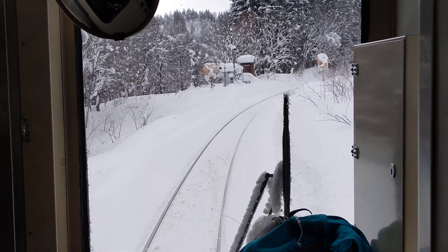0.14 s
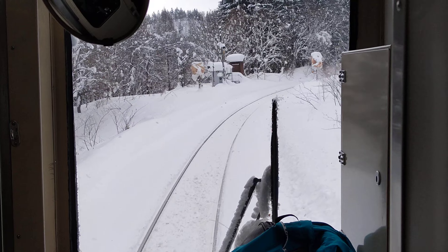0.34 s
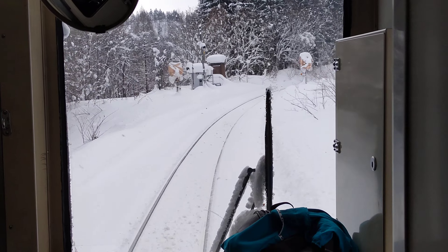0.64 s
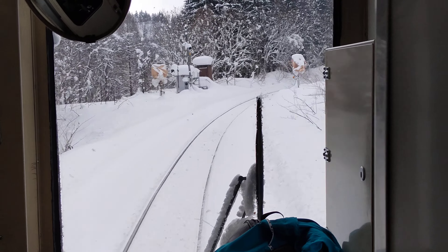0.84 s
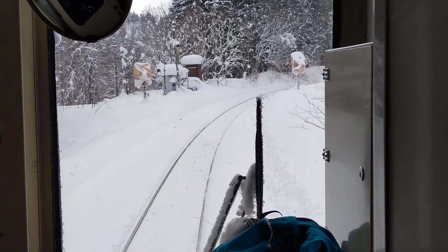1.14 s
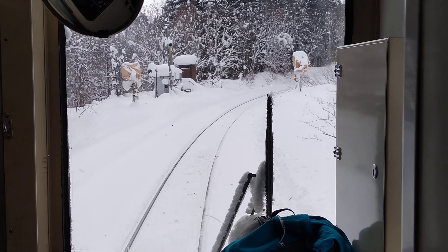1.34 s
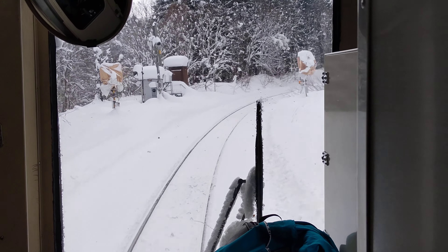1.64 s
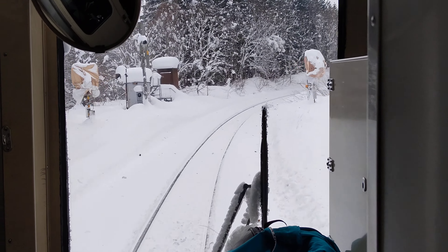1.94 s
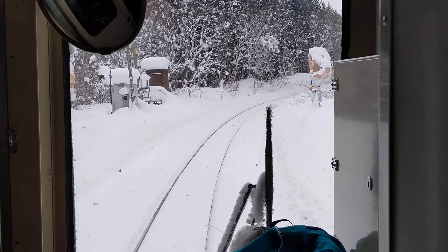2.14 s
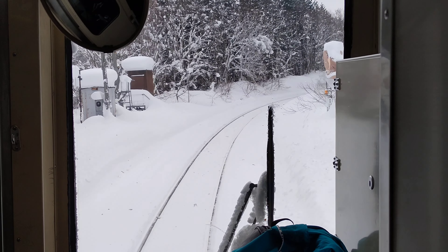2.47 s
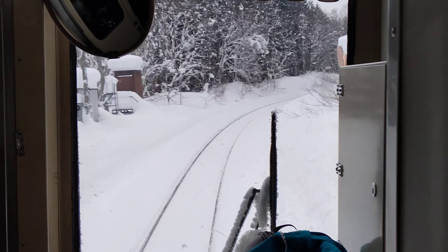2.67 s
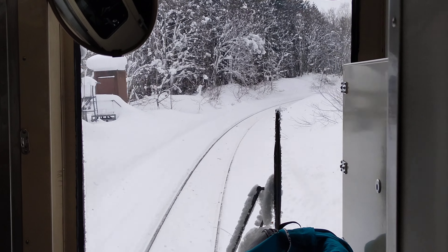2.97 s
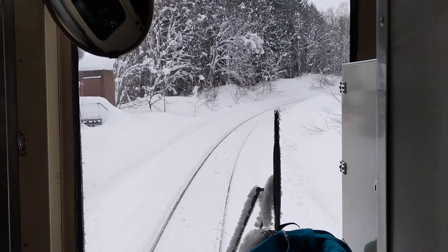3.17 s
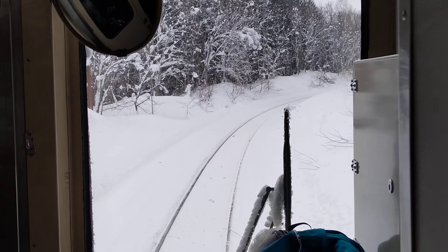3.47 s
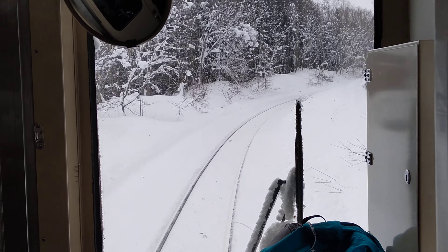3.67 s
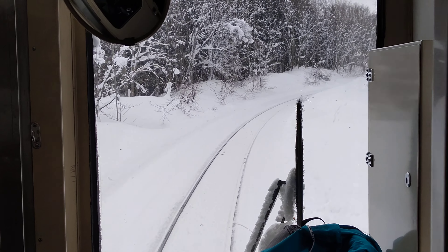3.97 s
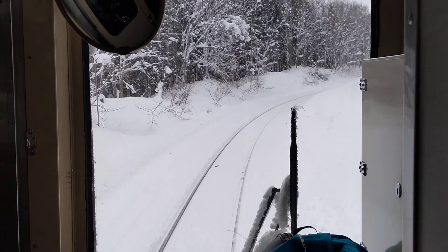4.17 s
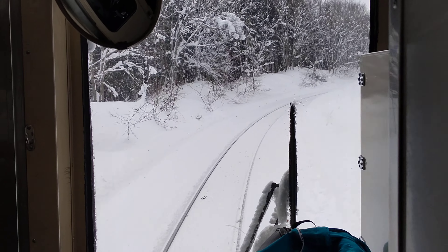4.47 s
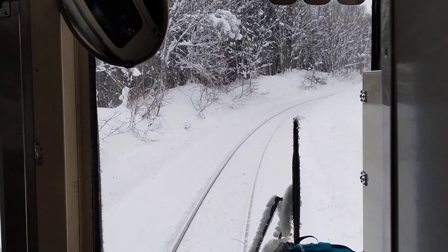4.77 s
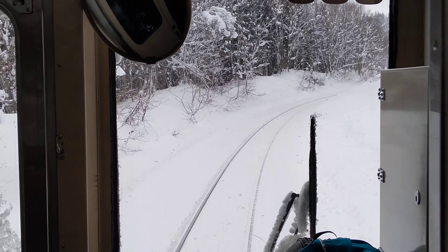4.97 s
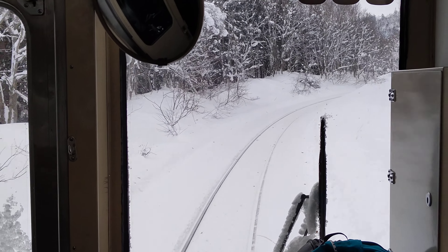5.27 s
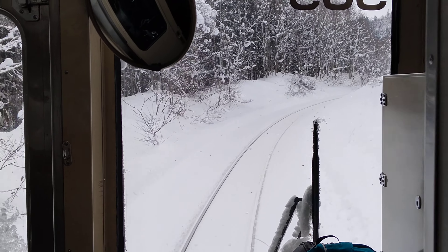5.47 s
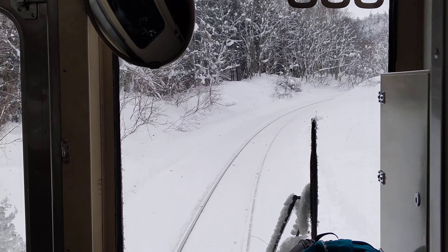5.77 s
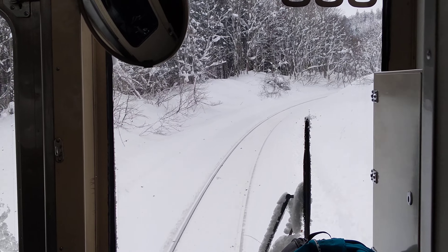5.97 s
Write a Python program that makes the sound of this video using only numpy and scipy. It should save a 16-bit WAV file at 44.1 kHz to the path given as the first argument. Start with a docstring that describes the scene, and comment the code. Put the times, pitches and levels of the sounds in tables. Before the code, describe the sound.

Inside the front cab of a moving diesel railcar, a heavy low rumble and soft rolling roar run throughout. Dull wheel thuds and loose fittings clatter in the first second. The underfloor engine then revs up, booming through the body, shuts off briefly near 2.7 seconds and settles into a steady drone. Small ticks and a few stronger thuds follow. Close, bass-heavy stereo, slightly overloaded on the loudest booms.

```python
"""Diesel railcar cab on a snowy line

Heard from inside the front cab while the railcar rolls along. The underfloor engine is a set of sine
orders that revs up and settles, booming through cab and body. The rolling wheels and the sway are shaped
noise; the wheels thud over joints in bursts of noise that ring the car body. Loose fittings rattle and
tick as short noise, narrow resonances ring, the rolling roar swells in chance patches of pitch, and
damped sines knock under the floor."""
import sys
import numpy as np
from scipy import signal
from scipy.fft import rfft, irfft, next_fast_len
from scipy.io import wavfile
from scipy.ndimage import uniform_filter1d

SR = 44100
rng = np.random.default_rng(int(sys.argv[2]) if len(sys.argv) > 2 else 0)


def voltage_ratio(decibels):
    """Convert decibels (scalar or array-like) to amplitude ratios, 20 dB per decade."""
    exponent = np.asarray(decibels, float) / 20
    return 10 ** exponent


def bounce(signal):
    """Save signal as a 16-bit WAV file at the path given by the first command-line argument."""
    frames = np.transpose(np.atleast_2d(signal))
    limited = np.clip(frames, -1, 1)
    pcm = np.round(limited * 32767).astype(np.int16)
    wavfile.write(sys.argv[1], SR, pcm)


N = 269451   # length in samples

# Resonances of the car body. Each row: pitch in Hz, width in Hz, strength in dB.
BODY_RESONANCES = [(35, 11, -6), (75, 37, 6), (122.2, 44, 7.5), (154.7, 21.4, 8), (161.2, 7.7, 5),
                   (188.3, 7.7, -2), (240, 35, 4.5), (277.5, 12, 6.5), (370, 16, 2), (476, 12, 4),
                   (657, 10, 4.5)]
# Colour of the rolling roar in the cab. Each row: frequency in Hz, relative level in dB per Hz.
ROAR_COLOUR = [(180, -23.5), (300, 0), (330, -6), (456, -9), (518, -13.5), (649, -11.5), (813, -14.5),
               (1220, -16.5), (1970, -16), (2510, -26), (3690, -25), (7250, -36.5), (12700, -42),
               (14000, -43)]
# How alike left and right are. Each row: frequency in Hz, likeness from -1 (opposite) to 1 (the same).
LIKENESS_BY_PITCH = [(60, 1), (130, 0.94), (280, 0.9), (610, 0.5), (1330, -0.23), (2880, 0.053),
                     (6250, -0.08), (13600, 0.041)]


def rms_one(x):
    """Scales a sound to an rms of 1."""
    return x / np.sqrt(np.mean(x ** 2) + 1e-20)


def in_time(rows):
    """Joins rows that begin with a time into one curve of straight lines per remaining column."""
    s, *columns = np.transpose(rows)
    return [np.interp(np.arange(N) / SR, s, column) for column in columns]


def at_hz(points, hz):
    """Reads a (Hz, value) curve between its points, on a logarithmic pitch scale."""
    point_hz, values = np.transpose(points)
    return np.interp(np.log(hz), np.log(point_hz), values)


def drift(rate_hz):
    """Slow chance wandering of spread 1: noise through two equal low-pass poles."""
    pole = np.exp(-80 * np.pi * rate_hz / SR)   # computed at every 40th sample only
    noise = rng.standard_normal(N // 40 + 2002)
    slow = signal.lfilter([1], [1, -2 * pole, pole * pole], noise)[2000:]   # skip the start-up
    slow = rms_one(slow - slow.mean())
    return np.interp(np.arange(N) / 40, np.arange(len(slow)), slow)


def resonant_gain(peaks, hz):
    """Gain of a flat path plus a row of resonances, whose powers add."""
    power = 1
    for top, width, db in peaks:
        power = power + voltage_ratio(db) ** 2 / (1 + (2 * (hz - top) / width) ** 2) ** 2
    return np.sqrt(power)


def within(hz, low_hz, high_hz):
    """Gain of a band with steep edges."""
    return 1 / np.sqrt((1 + (low_hz / hz) ** 8) * (1 + (hz / high_hz) ** 8))


def as_stereo(mid, side, alike):
    """Mixes two unrelated noises into left and right with the wanted likeness."""
    return np.sqrt(1 + alike) * mid + np.sqrt(1 - alike) * side * np.array([[1], [-1]])


def stereo_noise(gain_at):
    """Two-channel noise with a given spectrum, alike in the bass and nearly unrelated in the treble; rms 1."""
    size = next_fast_len(N)
    hz = np.maximum(np.arange(size // 2 + 1) * SR / size, .1)
    alike = np.clip(at_hz(LIKENESS_BY_PITCH, hz), -.99, .99)
    mid, side = rfft(rng.standard_normal((2, size))) * gain_at(hz)
    return rms_one(irfft(as_stereo(mid, side, alike), size)[:, :N])


def evened(noise, window_s):
    """Noise with its slower chance swells flattened."""
    power = uniform_filter1d(np.mean(noise ** 2, axis=0), size=int(window_s * SR))
    return noise / np.sqrt(power + .05)


def bursts(times, db, t60, rise_s):
    """Envelope of blows that swell quickly and die away by 60 dB in t60 seconds; powers add."""
    power = np.zeros(N)
    for s, level, decay in np.broadcast(times, db, t60):
        start = round(s * SR)
        t = np.arange(min(N - start, int(decay * SR))) / SR
        blow = voltage_ratio(level - 60 * t / decay) * (1 - np.exp(-t / rise_s))
        power[start:start + len(t)] += blow ** 2
    return np.sqrt(power)


def swells(rows):
    """Noise rings through one resonance: wide ones speak at once, narrow ones swell; then they fade."""
    out = np.zeros((2, N))
    count = 8192   # samples per swell
    t = np.arange(count) / SR
    bins_hz = np.arange(count // 2 + 1) * SR / count
    for s, hz, width, db, length in rows:
        start = round(s * SR)
        mid, side = rng.standard_normal((2, count))
        alike = np.clip(at_hz(LIKENESS_BY_PITCH, hz), -.99, .99)
        spectrum = rfft(as_stereo(mid, side, alike)) / (1 + (2 * (bins_hz - hz) / width) ** 2)
        noise = rms_one(irfft(spectrum))
        rise = 1 - np.exp(-1.3 * width * t)
        fade = np.exp(-(1.35 * t / length) ** 0.98) * (1 - t * SR / count)   # reaches silence at the end
        out[:, start:start + count] += (voltage_ratio(db) * noise * 2.1 * rise * fade)[:, :N - start]
    return out


def rolling():
    """Sway mostly below hearing, rumble ringing the body, and a diffuse roar that flickers by band."""
    # Each row: time in seconds, rumble in the body in dB, roar in the cab in dB.
    roll_levels = [(0.0, -31.5, -45.5), (0.59, -25.5, -43), (0.87, -23, -43.5), (2.47, -22.5, -44),
                   (2.77, -28.5, -46), (4.07, -25, -42.5), (4.2, -28, -43.5), (4.93, -24.5, -43.5),
                   (5.21, -30.5, -44), (6.11, -27.5, -43.5)]
    # Each row: frequency in Hz, relative level in dB per Hz before the body colours it.
    rumble_colour = [(25, -4), (50, -6.5), (76, 1), (98, -5.5), (130, 3.5), (220, -7), (400, -21),
                     (600, -25.5), (1200, -83)]

    def body(hz):
        return resonant_gain(BODY_RESONANCES, hz)

    def sway_gain(hz):
        slow_hump = hz / 8.5 / (1 + (hz / 11) ** 3.52)
        return slow_hump * body(hz) * within(hz, 1.6, 49) ** 0.27

    rumble_db, roar_db = in_time(roll_levels)
    sway_db = -18.5 + 2 * drift(1.7)
    rumble_db = rumble_db + 1.93 * drift(27)
    sway = stereo_noise(sway_gain)
    rumble = stereo_noise(lambda hz: voltage_ratio(at_hz(rumble_colour, hz)) * body(hz))
    # the roar is split at 2500 Hz; only its lower part rings the body
    low = stereo_noise(lambda hz: voltage_ratio(at_hz(ROAR_COLOUR, hz)) * body(hz) * (hz < 2500))
    high = stereo_noise(lambda hz: voltage_ratio(at_hz(ROAR_COLOUR, hz)) * (hz >= 2500))
    shared = drift(7)   # both parts follow this one together
    low_db = 6 + 0.37 * shared + 1.7 * drift(22.0)
    high_db = -6.5 + 1.0 * shared + 0.27 * drift(21)
    roar = voltage_ratio(low_db) * low + voltage_ratio(high_db) * high
    return voltage_ratio(sway_db) * sway + voltage_ratio(rumble_db) * rumble + voltage_ratio(roar_db) * roar


def roar_patches():
    """The roar's wandering patchiness: faint noise swells scattered by chance through the middle range."""
    when, pitch, loudness, length = rng.random((110, 4)).T
    hz = 350 * 6.5 ** pitch   # 350 to 2275 Hz
    db = at_hz(ROAR_COLOUR, hz) + 10 * np.log10(hz) - 70.5 + 5 * loudness   # follows the roar at that pitch
    return swells(zip(when * (N - 1) / SR, hz, .11 * hz, db, .04 + .1 * length))


def rings():
    """Short noises ring resonances in the cab; each resonance keeps its own pitch and width."""
    # Each row: start in seconds, name of the resonance, level in dB, fading length in seconds.
    ring_times = [(.09, "hum", -21, 0.06), (.345, "bonk", -24.5, 0.05), (.385, "thump", -11.5, 0.034),
                  (.485, "thump", -16, 0.034), (.737, "clink", -38.5, .089), (.745, "clack", -40, 0.035),
                  (.76, "ping", -27.5, 0.023), (.79, "hum", -13, 0.069), (.88, "tock", -42, .07),
                  (.93, "deep hum", -30, 0.076), (1.08, "hum", -6, 0.032), (1.18, "high hum", -24, 0.11),
                  (1.4, "thump", -26, 0.16), (1.81, "boom", -9, 0.089), (2.55, "moan", -42.5, 0.36),
                  (2.97, "squeak", -49.5, 0.39), (3.58, "moan", -41, 0.091), (3.67, "ping", -38, 0.06),
                  (4.18, "squeak", -49.5, 0.21), (4.93, "clack", -41, 0.038), (5.145, "ping", -37, 0.024),
                  (5.15, "moan", -43.5, 0.16)]
    # Resonances in the cab, named as heard. Each name leads to: pitch in Hz, width in Hz.
    ringers = {"deep hum": (93, 14), "hum": (121.7, 25), "boom": (141, 19.4), "high hum": (144, 16),
               "thump": (234, 31.5), "bonk": (337, 46), "moan": (640, 31), "tock": (856, 50),
               "ping": (1145, 67), "clack": (1310, 110), "squeak": (1880, 220), "clink": (4830, 700)}
    return swells((s, *ringers[which], db, length) for s, which, db, length in ring_times)


def taps():
    """Dry broad ticks of noise that fall by 60 dB in 0.03 s, some duller than others."""
    # Each row: start in seconds, level in dB, left over right in dB, treble relative to the rest in dB.
    ticks = [(0.835, -35.5, -7.5, -12), (3.2655, -44.5, -2.5, -13.5), (3.275, -40.5, 8.5, -15),
             (3.2973, -42.5, -4, -10), (3.3112, -39.5, 2.5, -25.5), (3.793, -44, 0.1, -14),
             (4.344, -40, 7.5, -1.5), (4.36, -36.5, 8, -8.5)]
    out = np.zeros((2, N))
    hz = np.arange(1, 1026) * SR / 2048
    t = np.arange(2048) / SR
    for s, db, pan_db, top_db in ticks:
        middle = within(hz, 2300, 8500) * (hz / 3000) ** -.4
        treble = voltage_ratio(top_db) * within(hz, 8500, 14000)
        noise = rms_one(irfft(rfft(rng.standard_normal((2, 2048))) * (middle + treble)))
        sides_db = np.array([[.5], [-.5]]) * pan_db
        envelope = voltage_ratio(db - 60 * t / .03 + sides_db) * (1 - np.exp(-t / .0005))
        start = round(s * SR)
        out[:, start:start + 2048] += noise * envelope
    return out


def rattles():
    """Loose fittings chatter: grainy noise in three ranges whose strength differs from blow to blow."""
    # Each row: start in seconds, level of the middle range in dB, low range relative to it in dB,
    # high range relative to it in dB, left over right in dB.
    rattle_blows = [(0.031, -44.5, -17, -2.5, -1), (0.427, -41, -6, -17, 4.5), (0.4678, -31.5, 1, -10.5, 3),
                    (0.5087, -41.5, 6.5, -1.5, 0), (0.619, -46, 0.5, -2.5, 4), (0.7377, -34, -4.5, -2, 0.1),
                    (0.853, -47.5, 1, -2, 9), (1.07, -44.5, 6, -33, 3), (1.571, -49.5, 2, -16.5, 4.5),
                    (1.6274, -50.5, -8.5, 0, 4), (1.7397, -52.5, -11, 5, 2), (1.797, -50.5, 12.5, -16.5, 2),
                    (1.952, -42.5, 9.5, -18.5, 1), (2.111, -46.5, 5, -14.5, 2),
                    (2.3018, -45.5, -9, -7, 1.1), (2.587, -48.5, 2.5, -17, 7), (2.621, -39.5, 0, -24.5, 5),
                    (3.4416, -38, 2, -21, 2), (4.932, -43, 4.5, -18, -2), (5.6327, -43.5, 11.5, -18, -5)]
    # Resonances that colour the chatter, before sharpening. Each row: pitch in Hz, width in Hz, strength in dB.
    rattle_peaks = [(1480, 910, -4), (2040, 200, -7.5), (3730, 1200, -6.5), (4870, 660, -7.5),
                    (6200, 1700, -7.5), (8160, 1100, -4.5), (9560, 1300, -7), (11400, 1200, -19)]
    s, db, low_db, high_db, pan_db = np.transpose(rattle_blows)
    # each range: lower edge in Hz, upper edge in Hz, level shift in dB, t60 in seconds
    ranges = ((1100, 2240, low_db, 0.41), (2940, 5500, 0, 0.33), (7200, 16000, high_db, 0.12))
    out = 0
    for low_hz, high_hz, shift_db, t60 in ranges:
        def colour(hz):
            sharpened = resonant_gain(rattle_peaks, hz) ** 3 - .8
            return sharpened * within(hz, low_hz, high_hz)

        noise = evened(stereo_noise(colour), 0.054)
        sides = [bursts(s, db + shift_db + way * pan_db / 2, t60, 0.0014) for way in (1, -1)]
        grain = voltage_ratio(1.56 * drift(42))
        out = out + noise * np.array(sides) * grain
    return out


def knocks():
    """Something hard under the floor: each knock starts a few damped modes with new strengths."""
    # Each row: start in seconds, level in dB.
    knock_times = [(0.854, -21.5), (1.349, -29), (1.427, -27), (1.504, -27), (1.876, -29)]
    # Each row: pitch in Hz, level in dB before chance varies it, time to fall by 60 dB in seconds.
    knock_modes = [(483, -7.5, .06), (605, -2, .05), (760, -11.5, .05), (876, -16, .07)]
    out = np.zeros(N)
    t = np.arange(4096) / SR
    for s, db in knock_times:
        ring = 0
        for hz, level_db, t60 in knock_modes:
            mode_db = level_db + 1.4 * rng.standard_normal()
            ring = ring + voltage_ratio(mode_db - 60 * t / t60) * np.sin(2 * np.pi * hz * t)
        start = round(s * SR)
        out[start:start + len(t)] += voltage_ratio(db) * ring * (1 - np.exp(-t / 0.00088))
    return out


def thuds():
    """Each joint or bump shakes the body: a round dull boom, starting softly, with a knock above it."""
    # Wheels over joints and bumps; the leading axles meet a joint about every 1.5 s.
    # Each row: time in seconds, level of the boom in dB, knock relative to the boom in dB.
    wheel_blows = [(0.355, -17.5, -41), (0.486, -17.5, -9), (0.549, -17, -24), (0.761, -18.5, -9),
                   (0.86, -18, -16), (1.355, -22.5, -20.5), (1.427, -22.5, -7), (1.504, -17.5, -19),
                   (1.848, -18.5, -12.5), (1.974, -19, -22), (2.285, -35.5, 0), (2.646, -20.5, -19),
                   (3.354, -12, -36), (3.427, -17, -18), (4.542, -17.5, -11.5), (4.848, -10, -20),
                   (4.988, -10, -23)]
    s, db, knock_db = np.transpose(wheel_blows)
    s = s - .007   # the soft rise begins a little ahead of the listed time
    boom = stereo_noise(lambda hz: resonant_gain(BODY_RESONANCES, hz) ** 2.0 * within(hz, 192, 392))
    knock = stereo_noise(lambda hz: resonant_gain(BODY_RESONANCES, hz) * within(hz, 380, 760))
    boom = evened(boom, 0.032) * bursts(s, db, t60=0.23, rise_s=0.028)
    knock = evened(knock, 0.0084) * bursts(s, db + knock_db, t60=0.25, rise_s=0.012)
    return boom + knock


def engine():
    """Sine orders (multiples) of the running rate, wavering; each swells as it crosses a resonance."""
    # Each row: time in seconds, base rate of the engine in Hz.
    speeds = [(1.0, 21.2), (1.15, 26.1), (1.3, 27.9), (1.45, 30.7), (1.6, 31.8), (1.8, 34.8), (2.2, 37.8),
              (2.4, 39.9), (2.55, 43.0), (2.68, 43.7), (2.8, 41.7), (2.9, 41.2), (3.05, 39.3), (4.5, 39.2),
              (6.11, 38.8)]
    # Effort: pulling hard while it revs up, shut off at the top, then light.
    # Each row: time in seconds, effort in dB, lowest main order relative to the other main ones in dB.
    efforts = [(1.0, -28, .1), (1.2, -3.5, -3), (1.4, -0.4, -2), (1.65, -3.5, -1.7), (2.2, -4, 1.5),
               (2.45, -1.7, -0.5), (2.6, 0.5, -1.5), (2.7, -7, 10), (2.77, -22.5, 8), (2.85, -7.5, -8),
               (2.97, -13, 7), (3.3, -11, 3.5), (3.65, -13, 7.5), (4.0, -7.5, -1.8), (4.7, -6, -5.5),
               (5.05, -7, 2), (5.4, -7.5, -5.5), (5.8, -6, -4.5), (6.11, -10, 1.5)]
    # Main orders between the booms. Each order (multiple of the base rate) leads to: level in dB.
    main_orders = {2: -36, 3: -42, 4: -40.5}
    # Cab booms that lift a main order passing through. Each row: pitch in Hz, width in Hz, strength in dB.
    cab_booms = [(62, 14, -1.5), (71.6, 8.5, 23.5), (81.4, 9.5, 16.5), (109, 3.9, 15), (119.65, 12.9, 31.5),
                 (160, 30, 12)]
    # Weaker orders before the body colours them. Each row: order (multiple), level in dB.
    weak_orders = [(1, -42), (3.667, -41.5), (5, -48.5), (6, -49), (7, -53), (8, -57.5)]

    (hz,), (load_db, lowest_db) = in_time(speeds), in_time(efforts)
    phase = 2 * np.pi * np.cumsum(hz) / SR
    out = 0
    for order, db in main_orders.items():
        lift = np.sqrt(2) * resonant_gain(cab_booms, order * hz)
        if order == min(main_orders):
            lift = lift * voltage_ratio(lowest_db)
        level = voltage_ratio(db + load_db + 0.8 * drift(11.4))
        out = out + lift * level * np.sin(order * phase + 0.11 * drift(17))
    follow_db = 0.54 * (load_db - load_db.mean())   # weaker orders share about half of the effort's swing
    for order, db in weak_orders:
        lift = resonant_gain(BODY_RESONANCES, order * hz) ** 0.89
        level = voltage_ratio(db + follow_db + 3.8 * drift(3.6))
        out = out + lift * level * np.sin(order * phase + 1.2 * drift(2.1))
    return out


def engine_in_stereo():
    """The engine drone reaches the left side 0.19 ms later and 2 dB weaker than the right."""
    lag_s, pan_db = 0.00019, -2   # left over right in dB
    drone = engine()
    late = np.interp(np.arange(N) - lag_s * SR, np.arange(N), drone)
    return np.array([late * voltage_ratio(pan_db / 2), drone * voltage_ratio(-pan_db / 2)])


def scene():
    """All sources added together, the knocks equally on both sides."""
    background = rolling() + roar_patches() + rings()
    fittings = taps() + rattles()
    return background + fittings + knocks() + thuds() + engine_in_stereo()


def band_limit(x):
    """A steep low-pass at the top of the band."""
    return signal.sosfilt(signal.butter(12, 14160, fs=SR, output="sos"), x)


def record(dry):
    """The input stage overloads with a hard knee, roughening the loudest booms."""
    top, knee = .68, 5.0   # highest level (full scale is 1), hardness of the bend
    mix = dry / (1 + np.abs(dry / top) ** knee) ** (1 / knee)
    return band_limit(mix)


dry = scene()
out = record(dry)
bounce(out)
```